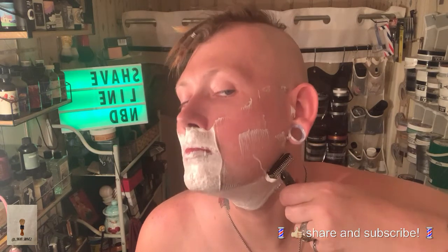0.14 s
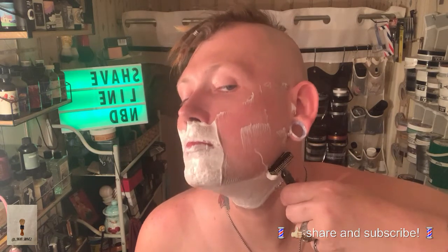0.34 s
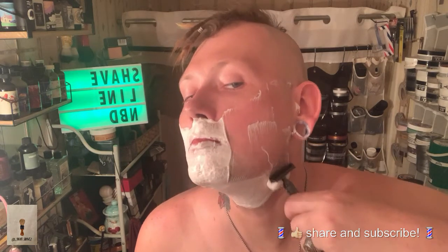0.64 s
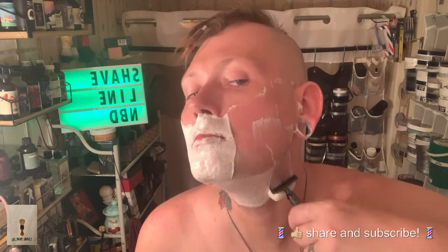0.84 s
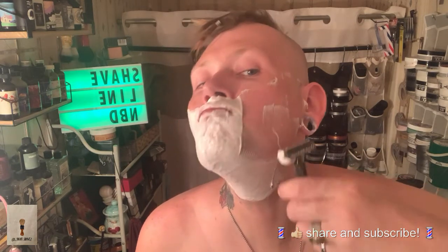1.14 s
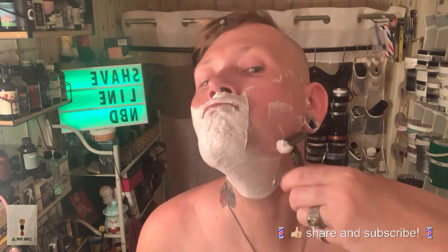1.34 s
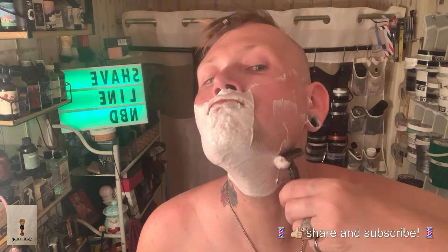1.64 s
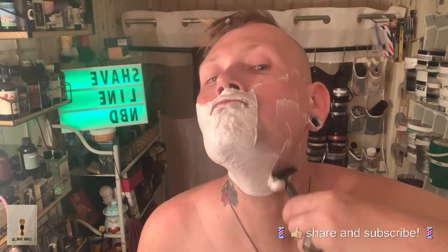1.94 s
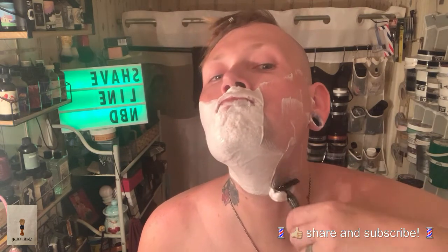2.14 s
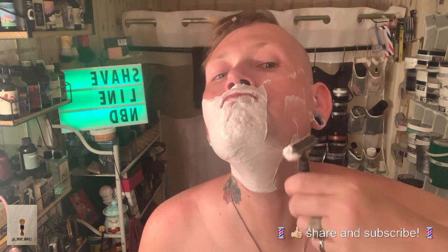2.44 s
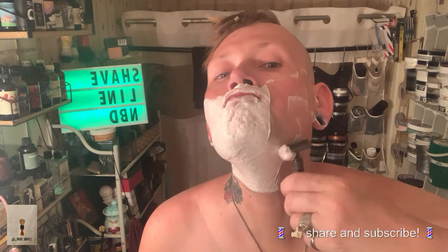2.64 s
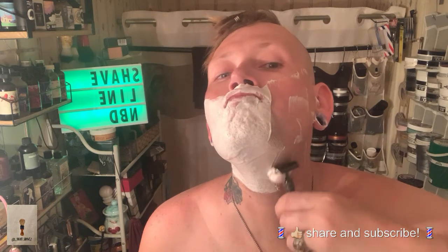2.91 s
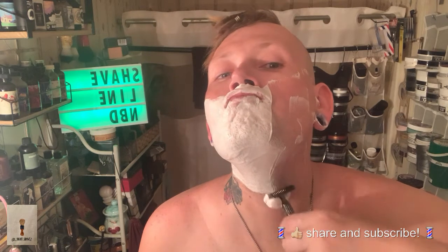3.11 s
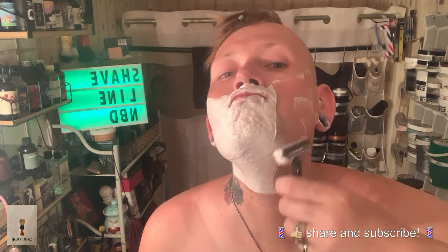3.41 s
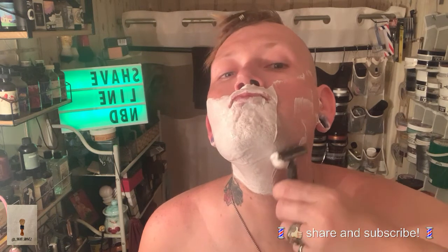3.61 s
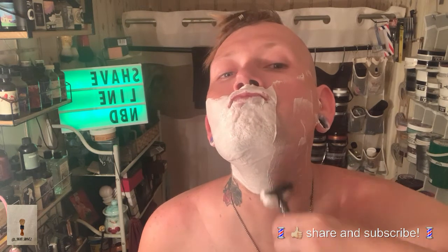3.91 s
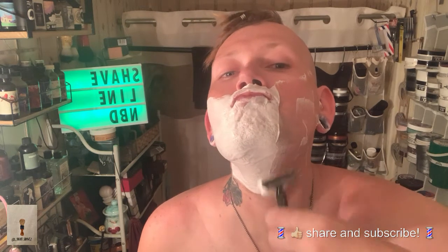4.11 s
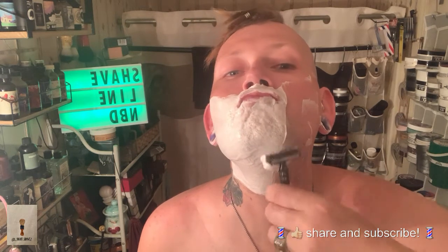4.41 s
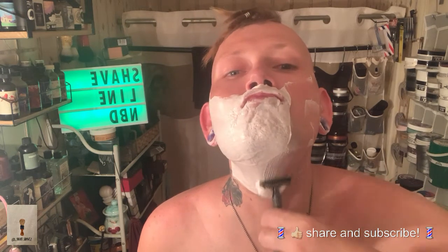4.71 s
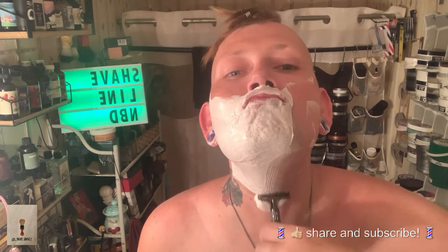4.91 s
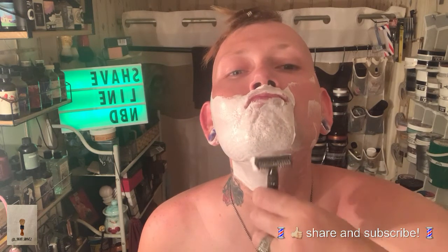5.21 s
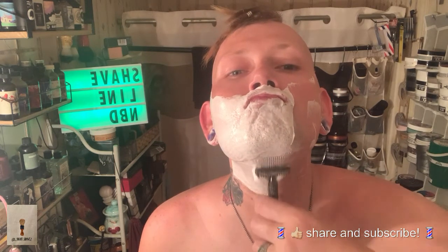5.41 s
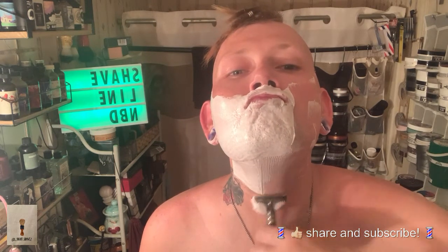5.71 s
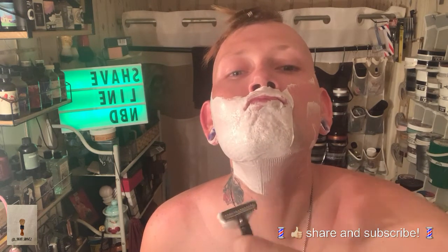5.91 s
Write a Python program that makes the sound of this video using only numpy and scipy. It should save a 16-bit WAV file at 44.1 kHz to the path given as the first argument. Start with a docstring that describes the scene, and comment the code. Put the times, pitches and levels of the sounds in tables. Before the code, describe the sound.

A safety razor scrapes through lathered stubble close to the microphone in a small bathroom. The first stroke is slow and faint, followed by a few sharp ticks. Five more short strokes come about a second apart, each a crisp rasp with a slight metallic ring, the last ones crackling with single coarse hairs. A ventilation fan hums low and steady throughout, with a very faint pip about once a second.

```python
"""A small bathroom, one microphone close to a safety razor working through lathered stubble.
A ventilation fan hums steadily behind, with a faint electrical whine and a soft pip about once a second.
Up front come six short strokes: each cut hair is a tiny snap that rings the blade and the razor head.
Coarse hairs click out singly, steel rubs and squeaks on wet skin, and a few sharp ticks fall in and
between the strokes. Mirror and shelves send quick echoes back to the microphone."""
import sys
import numpy as np
from scipy import signal
from scipy.fft import rfft, irfft, next_fast_len
from scipy.io import wavfile

SR = 44100
rng = np.random.default_rng(int(sys.argv[2]) if len(sys.argv) > 2 else 0)


def put_to_file(sound):
    """Save the sound as 16-bit audio at rate SR, in the file named by the first command-line argument."""
    columns = np.atleast_2d(sound).T  # one column per channel
    safe = np.clip(columns, -1, 1)
    whole_steps = np.round(safe * 32767)
    wavfile.write(sys.argv[1], SR, whole_steps.astype(np.int16))


N = 266951
TIME = np.arange(N) / SR

# shaft, mains and duct tones of the fan: pitch_hz, rms_db, waver_db
FAN_TONES = [(49.4, -53, .5), (58.1, -57.5, 1.5), (101.3, -63, 2), (119.96, -40.8, .15),
             (221.4, -73.5, 1.5), (258.6, -69.5, 1)]
# spectrum of the fan's moving air: frequency_hz, gain_db
AIR_COLOUR = [(15, -16.5), (35, -8), (64, 0.5), (84, -4.5), (135, -2.5), (165, -10.5), (205, -14),
              (270, -14.5), (440, -24), (700, -28), (1500, -34.7), (5000, -47), (12900, -52.7),
              (14000, -68)]
# room and duct resonances that the air stirs: pitch_hz, width_hz, gain_db
DUCT_MODES = [(138.6, 6.1, 3), (174.5, 5.2, -1), (302.4, 7.4, 6), (385.8, 15.5, 3), (492.3, 31, 4.5),
              (547, 11, 2.5), (720, 19, -15), (822, 37, -2.5), (893, 16, 2.5)]
# resonances of a soft pip: pitch_hz, width_hz, gain_db
PIP_MODES = [(3630, 240, 0), (3950, 400, -3)]

# sharp ticks of the razor: time_s, level_db, room_db, ring_db, cutoff_hz
TICKS = [(0.674, -42, -22, -26, 20000), (1.0591, -37, -3, 6, 7500), (1.0622, -49.5, -4, 8, 16000),
         (1.122, -43.5, 0, -21, 5500), (3.2973, -43, -12, -26, 20000), (4.4556, -51, -3, -20, 16000),
         (5.9451, -45, -6, -27, 20000)]
# spectrum of a tick: frequency_hz, gain_db
TICK_COLOUR = [(300, -15), (700, 2), (1400, -12), (2200, 8), (3000, 3), (4500, 7.5), (6000, 1.5), (8000, 2),
               (11500, -4), (13500, -18), (15500, -9)]
# what a tick sets ringing: pitch_hz, width_hz, gain_db
TICK_MODES = [(643, 370, 7), (895, 200, 9.5), (3020, 300, 7.5), (3380, 150, 0), (3800, 300, -11),
              (4260, 110, -27), (8000, 720, 3), (10400, 340, 12), (11300, 620, 17.5)]

# a short squeak of steel on wet skin: time_s, pitch_hz, rms_db
SQUEAK = [(.91, 6150, -90), (.92, 6070, -63), (.935, 6120, -81), (.965, 6100, -90)]
# the blade rubbing through lather: time_s, rms_db
SWISH_LEVELS = [(.34, -82), (.4, -73), (.45, -90), (.5, -76), (.6, -72), (.67, -88)]
# resonances of that rub: pitch_hz, width_hz, gain_db
SWISH_MODES = [(2920, 650, -7), (6600, 180, -2), (7900, 590, -10)]
# the razor gliding back up the neck in light contact: time_s, level_db
GLIDE_LEVELS = [(3.98, -83), (4.04, -72), (4.15, -70.5), (4.24, -67), (4.33, -67.5), (4.43, -72),
                (4.47, -82)]
# spectrum of the glide's hiss: frequency_hz, gain_db
GLIDE_COLOUR = [(1200, -27.5), (2000, 5.5), (2700, 2), (3500, -2), (6000, -1.5), (11000, -2.5), (13000, -6),
                (14500, -25)]
# resonances that the glide stirs: pitch_hz, width_hz, gain_db
GLIDE_MODES = [(1200, 110, 10), (3070, 70, 3), (3770, 70, 2), (4270, 60, -2), (5060, 100, 3),
               (6250, 200, -3), (7100, 120, -3), (7950, 190, 1), (10050, 110, 0)]

# single coarse hairs parting: time_s, direct_peak_db
COARSE_HAIRS = [(.0606, -57), (.1553, -53), (.2597, -57), (.7041, -58), (.8941, -56), (1.3927, -60),
                (1.472, -53), (1.4871, -55), (1.6063, -58), (2.1474, -52), (2.6865, -55), (2.7025, -54),
                (2.7224, -54), (4.5015, -48), (4.6217, -52), (4.6817, -48), (4.7578, -45), (5.4122, -48),
                (5.5239, -48), (5.5831, -48), (5.6317, -46), (5.6811, -42.5)]
# spectrum of a coarse hair's snap: frequency_hz, gain_db
HAIR_COLOUR = [(1000, -22), (2200, -10), (4500, -7), (7500, 0), (11000, -1), (12800, -6), (13800, -28)]
# stubble under the blade: time_s, snaps_per_s
STUBBLE = [(0, 1000), (1.6, 1120), (2.0, 8100), (3.1, 5600), (3.9, 5000), (4.5, 3600), (4.8, 1750),
           (5.6, 2200)]

# steel resonances of the razor head, main ring first: pitch_hz, width_hz, gain_db
HEAD_MODES = [(2030, 150, 0), (1200, 110, -11), (2200, 220, -11), (2300, 90, -4)]
# skin damps the head and blurs its main ring: time_s, width_hz
HEAD_DAMPING = [(.75, 650), (1.45, 200), (2.0, 220), (2.85, 260), (3.05, 200), (3.7, 208), (4.3, 170),
                (4.52, 250), (5.4, 200), (5.62, 450)]
# steel resonances of the blade: pitch_hz, width_hz, gain_db
BLADE_MODES = [(3090, 60, 5), (4530, 40, 3), (5080, 45, 5), (5685, 45, 5), (6020, 40, 0), (6290, 60, -3),
               (6590, 110, -3), (6720, 35, 1), (7050, 40, -1), (7640, 80, -4), (8960, 45, -3),
               (9660, 80, 3), (10780, 110, -4)]
# treble region that the blade favours, narrow and low along the jaw, broad and high on the throat:
# time_s, centre_hz, width_hz
BLADE_FOCUS = [(.2, 9050, 5400), (.55, 6840, 5400), (1.6, 7500, 6000), (1.9, 5400, 2600), (2.1, 6050, 3600),
               (2.95, 5900, 2600), (3.1, 5930, 2800), (3.7, 7150, 5400), (3.92, 5700, 2400),
               (4.0, 7100, 5400), (4.5, 10000, 4400), (4.7, 8300, 5400), (4.85, 8400, 4200),
               (5.4, 10300, 4400), (5.72, 8600, 4800)]
# spectrum of the cut's rasp: frequency_hz, gain_db
RASP_COLOUR = [(900, -4.5), (1600, -7), (2200, -18), (2700, 8.5), (3100, 0), (3600, 3), (4700, 1.5),
               (5600, 3.5), (6600, 1), (8000, -12), (11000, -45), (14000, -70)]
# spectrum of the cut's crisp top: frequency_hz, gain_db
CRISP_COLOUR = [(3000, -27), (5500, -17), (7500, -1), (9600, 1), (11000, 0.5), (12600, -1.5), (13300, -8),
                (13800, -40), (15500, -23)]
# small tufts that catch on the edge: time_s, rasp_db, crisp_over_rasp_db
TUFTS = [(.066, -83, 9), (.112, -82, 6), (.159, -78, 0), (.264, -92, 14), (.31, -82.5, 11),
         (.505, -73, 2.5), (.698, -76, 4), (.775, -76.5, 8.5), (0.909, -65.5, 3.5), (1.476, -82, 9),
         (1.61, -73, -2), (1.665, -79, 4), (1.835, -71, 1), (2.08, -69, -2), (2.18, -64.5, 2.5),
         (2.69, -81, 14), (2.74, -82, 16.5), (2.918, -64, -8), (3.025, -57.5, -5), (3.075, -58.5, 3),
         (3.635, -84, 6), (3.922, -60, -4), (4.462, -63.5, 1), (4.512, -61, 2.5), (4.56, -60.5, 1.5),
         (4.795, -68, 7), (4.848, -57.5, 0.5), (5.365, -88, 2), (5.412, -76, 9.5), (5.59, -72, 13),
         (5.888, -75, -1.5)]
# strokes of the razor, each a drag and then a quick sweep: start_s, length_s, swell_s, sweep_s,
# drag_db, sweep_db, crisp_over_rasp_db, drag_ring_db, sweep_ring_db, bite_ring_db
STROKES = [(0.0, 0.92, 0.34, 0.28, -80.5, -79, -3.5, -79.5, -76, -3),
           (1.372, 0.73, 0.18, 0.11, -76.5, -59, -4, -73.5, -64, 0),
           (2.692, 0.44, 0.4, 0.03, -77.5, -56, -0.5, -61.5, -65.5, -8.5),
           (3.602, 0.35, 0.058, 0.027, -65.5, -57, 0.5, -71, -64.5, 10),
           (4.447, 0.396, 0.045, 0.055, -66, -58, 0, -72, -71, 4.5),
           (5.345, 0.37, 0.19, 0.052, -70, -63, 0, -71.5, -71.5, 3)]


def from_db(db):
    """Decibels to gain."""
    return 10 ** (np.asarray(db) / 20)


def unit_rms(x):
    """Scale to rms 1."""
    return x / np.sqrt(np.mean(x ** 2) + 1e-20)


def drift(rate_hz):
    """A smooth random wander with rms near 1."""
    step, settle = 40, 2000
    r = np.exp(-2 * np.pi * step * rate_hz / SR)
    noise = rng.standard_normal(N // step + settle + 2)
    slow = signal.lfilter([1], [1, -2 * r, r * r], noise)[settle:]
    return np.interp(np.arange(N) / step, np.arange(len(slow)), unit_rms(slow))


def curves(rows):
    """The columns that follow time_s, interpolated to every sample."""
    time_s, *columns = np.transpose(rows)
    return [np.interp(TIME, time_s, column) for column in columns]


def envelope(times_s, levels_db):
    """A gain that follows the levels and is silent before and after them."""
    return from_db(np.interp(TIME, times_s, levels_db, left=-np.inf, right=-np.inf))


def impulses(times_s, levels_db):
    """Single clicks at given moments."""
    out = np.zeros(N)
    out[np.round(np.asarray(times_s) * SR).astype(int)] = from_db(levels_db)
    return out


def colour(x, points):
    """Causal (minimum-phase) filter that follows rows of frequency_hz, gain_db."""
    size = 2 * next_fast_len(N // 2 + SR // 4)
    hz, gain_db = np.transpose(points)
    bins_hz = np.maximum(np.arange(size // 2 + 1) * SR / size, 1)
    gain = from_db(np.interp(np.log(bins_hz), np.log(hz), gain_db))
    cepstrum = irfft(np.log(gain))
    cepstrum[1:size // 2] *= 2
    cepstrum[size // 2 + 1:] = 0
    return irfft(rfft(x, size) * np.exp(rfft(cepstrum)))[:N]


def resonate(x, modes):
    """Parallel resonances from rows of pitch_hz, width_hz, gain_db."""
    out = np.zeros(N)
    for pitch_hz, width_hz, gain_db in modes:
        r = np.exp(-np.pi * width_hz / SR)
        poles = [1, -2 * r * np.cos(2 * np.pi * pitch_hz / SR), r * r]
        out += from_db(gain_db) * (1 - r * r) / 2 * signal.lfilter([1, 0, -1], poles, x + 1e-18)
    return out


def moving_resonance(x, centre_hz, width_hz, block=256):
    """A resonance of steady power whose centre and width follow curves, stepped block by block."""
    r = np.exp(-np.pi * width_hz / SR)
    state, out = np.zeros(2), np.zeros(N)
    for i in range(0, N, block):
        poles = [1, -(1 + r[i] ** 2) * np.cos(2 * np.pi * centre_hz[i] / SR), r[i] ** 2]
        out[i:i + block], state = signal.lfilter([1, 0, -1], poles, x[i:i + block], zi=state)
    return np.sqrt((1 - r * r) / 2) * out


def bathroom(x, early_s=0.034, tail_db=-12, tail_t60_s=0.26):
    """Dense echoes of unit energy: a quick burst off the nearby mirror and shelves, then a short tail."""
    t = TIME[:SR // 3]
    fade = from_db(-20 * t / early_s) + from_db(tail_db - 60 * t / tail_t60_s)
    echoes = rng.standard_normal(len(t)) * fade * (t > .001)
    return signal.fftconvolve(x, echoes / np.linalg.norm(echoes))[:N]


def fan(air_rms_db=-49.5):
    """The room tone: wavering motor tones over a rumble of air that stirs the duct."""
    tones = np.zeros(N)
    for pitch_hz, rms_db, waver_db in FAN_TONES:
        amplitude = np.sqrt(2) * from_db(rms_db + waver_db * drift(1.0))
        tones += amplitude * np.sin(2 * np.pi * (pitch_hz * TIME + rng.random()))
    air = colour(rng.standard_normal(N), AIR_COLOUR)
    return tones + from_db(air_rms_db) * unit_rms(air + resonate(air, DUCT_MODES))


def whine(pitch_hz=14523, wander_hz=8, rms_db=-82.5):
    """Far back, a thin, slightly unsteady tone from a power supply."""
    hz = pitch_hz + wander_hz * drift(16)
    return from_db(rms_db) * np.sqrt(2) * np.sin(2 * np.pi * np.cumsum(hz) / SR)


def pips(first_s=.373, every_s=.9735, peak_db=-61):
    """Tiny, rounded pitched clicks at a steady pace in the background, perhaps a dripping tap."""
    unit_pip = resonate(resonate(impulses([0], [0]), PIP_MODES), PIP_MODES)
    drops = impulses(np.arange(first_s, TIME[-1], every_s), peak_db)
    return resonate(resonate(drops, PIP_MODES), PIP_MODES) / np.abs(unit_pip).max()


def ticks():
    """Brief ticks, duller when the contact is soft; a hard one rings the razor and stirs the room."""
    unit_peak = np.abs(colour(impulses([0], [0]), TICK_COLOUR)).max()
    direct, to_room = np.zeros(N), np.zeros(N)
    for time_s, level_db, room_db, ring_db, cutoff_hz in TICKS:
        softness = signal.butter(2, cutoff_hz, fs=SR, output="sos")
        click = signal.sosfilt(softness, impulses([time_s], [level_db]) + 1e-18)
        tick = click + from_db(ring_db) * resonate(click, TICK_MODES)
        direct += tick
        to_room += from_db(room_db) * tick
    return colour(direct + bathroom(to_room), TICK_COLOUR) / unit_peak


def squeak(jitter_hz=80):
    """Stick-slip makes the blade sing for a moment as the first stroke ends."""
    time_s, pitch_hz, rms_db = np.transpose(SQUEAK)
    hz = np.interp(TIME, time_s, pitch_hz) + jitter_hz * drift(150)
    return np.sqrt(2) * envelope(time_s, rms_db) * np.sin(2 * np.pi * np.cumsum(hz) / SR)


def swish():
    """Midway through the first, slow stroke the flat of the blade rubs through lather and rings softly."""
    rub = unit_rms(resonate(rng.standard_normal(N), SWISH_MODES))
    return envelope(*np.transpose(SWISH_LEVELS)) * rub


def head_ring(drive, side_modes_db=-6, spurt_db=1.3, rise_per_width=0.28):
    """The head rings in uneven spurts; where the skin grips it, its main ring broadens and climbs."""
    free_hz, free_width_hz, _ = HEAD_MODES[0]
    width_hz, = curves(HEAD_DAMPING)
    pitch_hz = free_hz + rise_per_width * (width_hz - free_width_hz)
    main = unit_rms(moving_resonance(drive, pitch_hz, width_hz))
    side_modes = from_db(side_modes_db) * unit_rms(resonate(drive, HEAD_MODES[1:]))
    spurts = from_db(spurt_db * drift(11))
    return unit_rms(spurts * (main + side_modes))


def glide(friction_db=-5, head_db=-4):
    """Sliding back up the neck, the razor cuts nothing: smooth friction hisses and rings the head."""
    friction = rng.standard_normal(N)
    rub = from_db(friction_db) * friction + resonate(friction, GLIDE_MODES)
    hiss = unit_rms(colour(rub, GLIDE_COLOUR))
    head = from_db(head_db) * head_ring(friction, side_modes_db=-16)
    return envelope(*np.transpose(GLIDE_LEVELS)) * (hiss + head)


def coarse_hairs(room_db=5):
    """Each parts with one crisp click, which reaches the microphone just ahead of its echoes."""
    unit_peak = np.abs(colour(impulses([0], [0]), HAIR_COLOUR)).max()
    clicks = impulses(*np.transpose(COARSE_HAIRS))
    return colour(clicks + from_db(room_db) * bathroom(clicks), HAIR_COLOUR) / unit_peak


def hair_snaps(spread_db=0.5, friction_db=-8, clump_db=3.5):
    """Hairs of uneven thickness part in clumps, over the smooth friction of steel on skin."""
    snaps_per_s, = curves(STUBBLE)
    cuts = rng.random(N) < snaps_per_s * from_db(clump_db * drift(120)) / SR
    sizes = from_db(spread_db * np.minimum(rng.exponential(1, N), 5))
    signs = rng.choice([-1, 1], N)
    snaps = unit_rms(cuts * sizes * signs / np.sqrt(snaps_per_s))   # as loud when sparse as when dense
    return snaps + from_db(friction_db) * rng.standard_normal(N)


def blade_ring(snaps, focus_db=-7, modes_db=5):
    """The angle of the edge favours one region of the treble, and the blade modes that lie in it."""
    steel = snaps + from_db(modes_db) * resonate(snaps, BLADE_MODES)
    return snaps + from_db(focus_db) * moving_resonance(steel, *curves(BLADE_FOCUS))


def tuft(time_s, rasp_db, crisp_over_rasp_db, ring_over_rasp_db=-8, rise_s=0.012, fall_s=0.024):
    """The edge catches a tuft in one brief burst: gains of rasp, crisp top and head ring."""
    burst = np.exp(-np.maximum((time_s - TIME) / rise_s, (TIME - time_s) / fall_s))
    gains = from_db([rasp_db, rasp_db + crisp_over_rasp_db, rasp_db + ring_over_rasp_db])
    return np.outer(gains, burst)


def stroke(start_s, length_s, swell_s, sweep_s, drag_db, sweep_db, crisp_over_rasp_db,
           drag_ring_db, sweep_ring_db, bite_ring_db):
    """The edge bites, drags, sweeps and leaves the skin: gains of rasp, crisp top and head ring."""
    attack_s, bite_s, unload_s = 0.013, 0.16, 0.033
    exit_db, exit_s = 3, 0.2   # the top gets crisper as the edge speeds off the skin
    release_db_per_s, rasp_fade_db_per_s, ring_fade_db_per_s = 340, 47, 246
    age_s = TIME - start_s
    past_end_s = age_s - length_s
    speed = np.clip(1 + (past_end_s + sweep_s) / swell_s, 0, 1)   # 0 in the drag, 1 in the sweep
    contact = np.clip(age_s / attack_s, 0, 1) * from_db(-release_db_per_s * np.maximum(past_end_s, 0))
    bite = np.exp(-np.maximum(age_s, 0) / bite_s)
    leaving = np.exp(np.minimum(past_end_s, 0) / exit_s)
    rasp_db = drag_db + speed * (sweep_db - drag_db)
    crisp_db = rasp_db + crisp_over_rasp_db + exit_db * leaving
    ring_db = drag_ring_db + speed * (sweep_ring_db - drag_ring_db) + bite_ring_db * bite
    # the pressure eases just before the end: the head stops ringing and the rasp thins
    unloaded_s = np.maximum(past_end_s + unload_s, 0)
    rasp_db -= rasp_fade_db_per_s * unloaded_s
    ring_db -= ring_fade_db_per_s * unloaded_s
    return contact * from_db([rasp_db, crisp_db, ring_db])


def razor(rasp_trim_db=-2, room_db=-7):
    """Close up, the same snaps sound as rasp, crisp top and head ring, in shares that shift as it cuts."""
    power = sum(stroke(*row) ** 2 for row in STROKES) + sum(tuft(*row) ** 2 for row in TUFTS)
    rasp_gain, crisp_gain, ring_gain = np.sqrt(power)
    snaps = hair_snaps()
    blade = blade_ring(snaps)
    rasp = from_db(rasp_trim_db) * rasp_gain * unit_rms(colour(blade, RASP_COLOUR))
    crisp = crisp_gain * unit_rms(colour(blade, CRISP_COLOUR))
    direct = rasp + crisp + ring_gain * head_ring(snaps)
    wet = from_db(room_db)
    return (direct + wet * bathroom(direct)) / np.hypot(1, wet)


def scene():
    """The shave up front and the steady room behind it, at one microphone."""
    shave = razor() + coarse_hairs() + swish() + glide() + squeak() + ticks()
    background = pips() + fan() + whine()
    return (shave + background)[None]


def record(dry):
    """The microphone channel opens with a very short fade and cuts the highest treble steeply."""
    fade_in_s, cutoff_hz = .004, 15700
    opening = np.minimum(TIME / fade_in_s, 1)
    lowpass = signal.ellip(10, .1, 80, cutoff_hz, fs=SR, output="sos")
    return signal.sosfilt(lowpass, opening * dry)


dry = scene()
out = record(dry)
put_to_file(out)
```